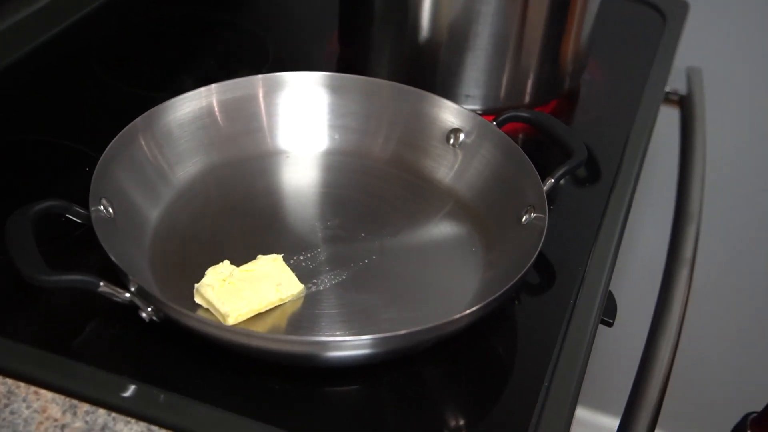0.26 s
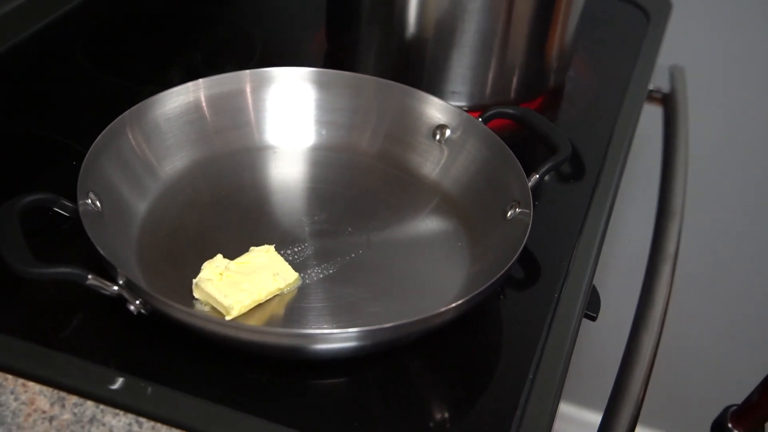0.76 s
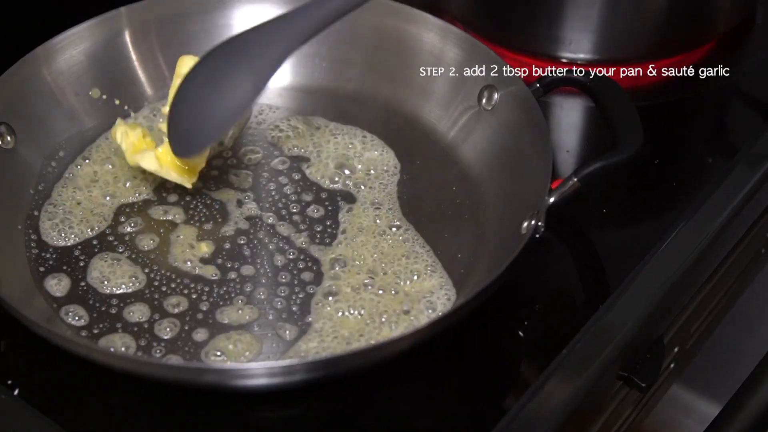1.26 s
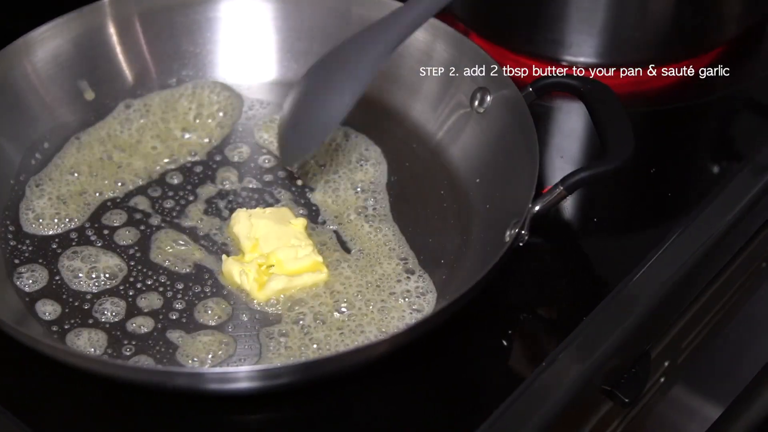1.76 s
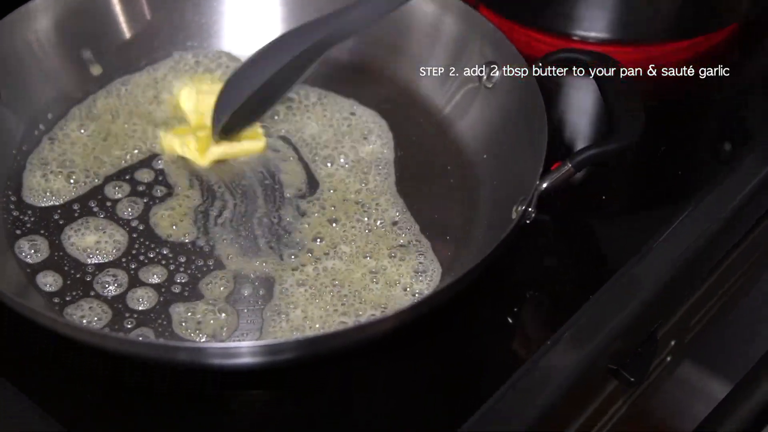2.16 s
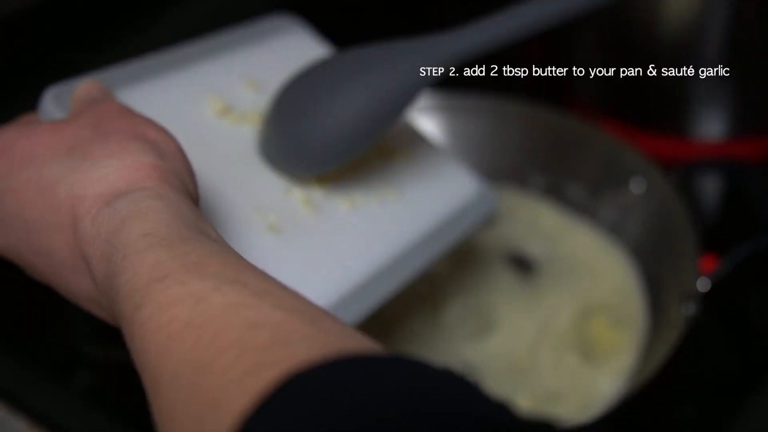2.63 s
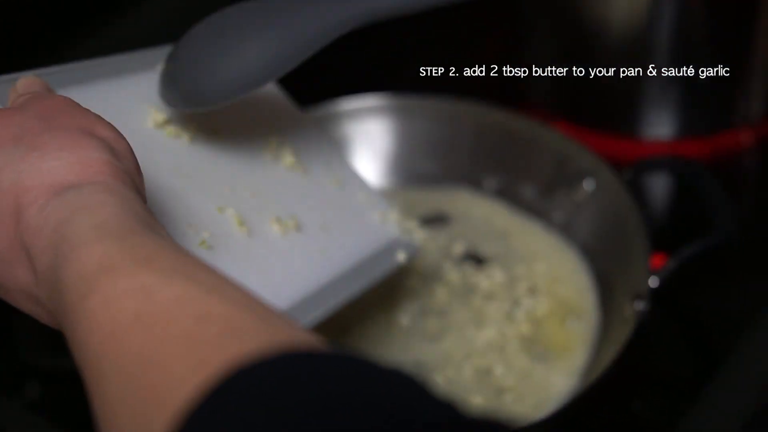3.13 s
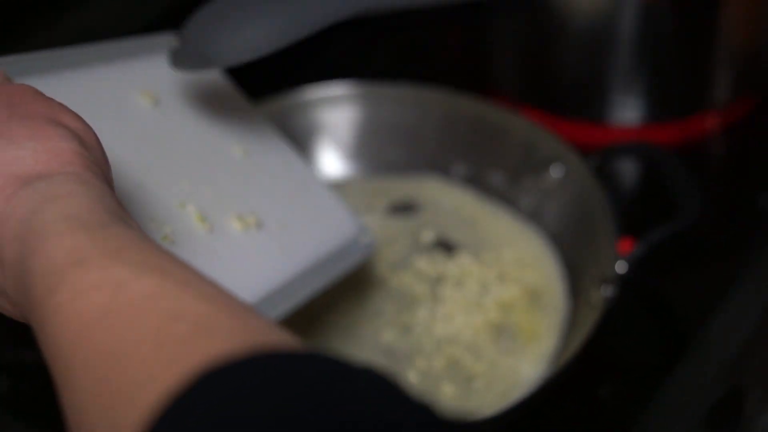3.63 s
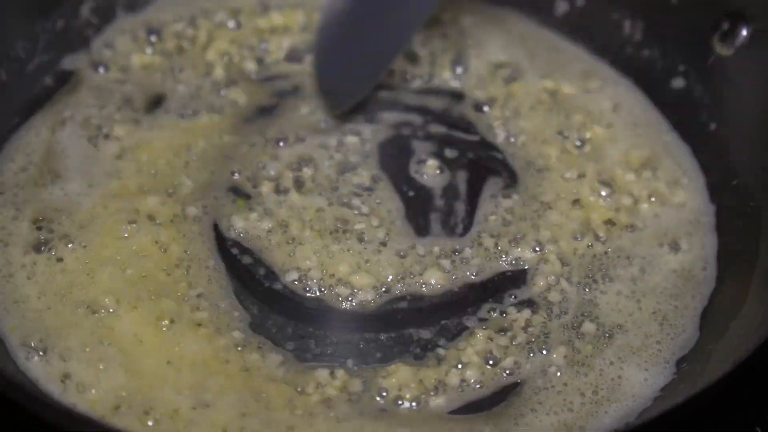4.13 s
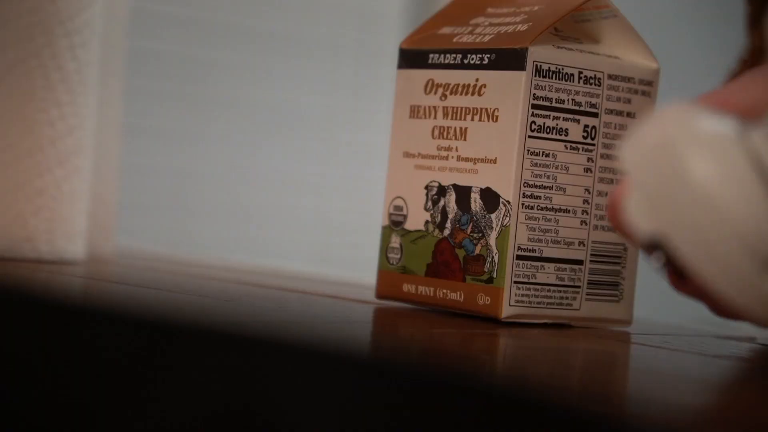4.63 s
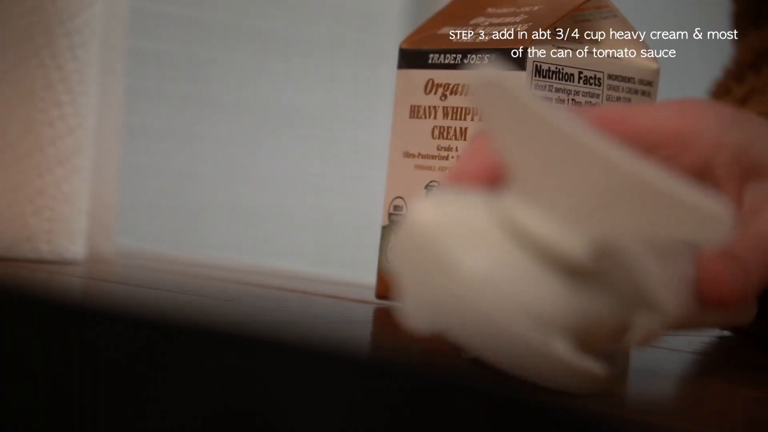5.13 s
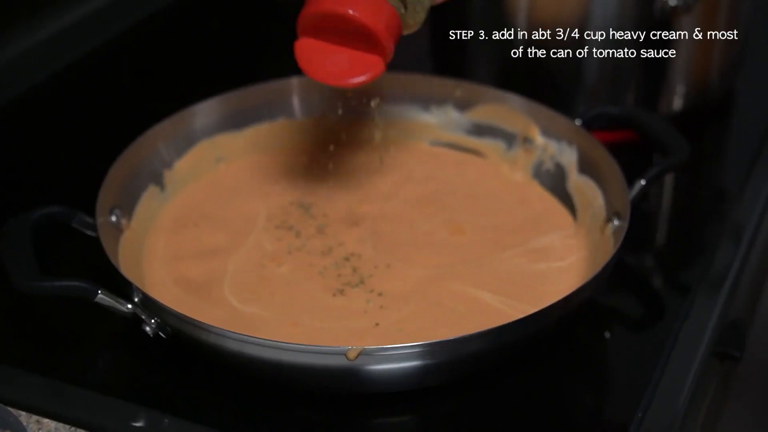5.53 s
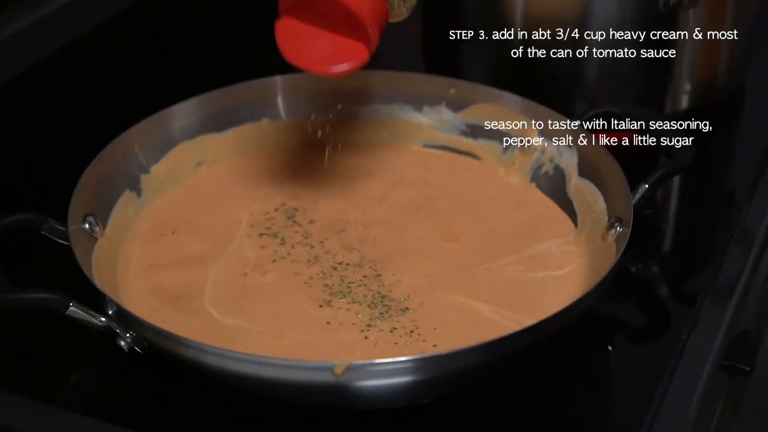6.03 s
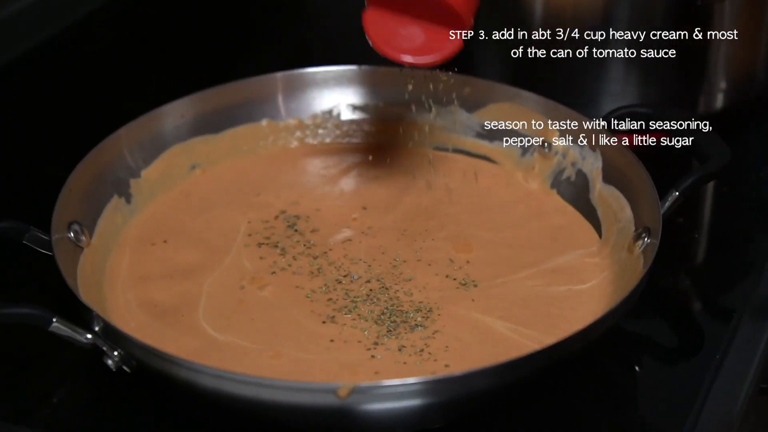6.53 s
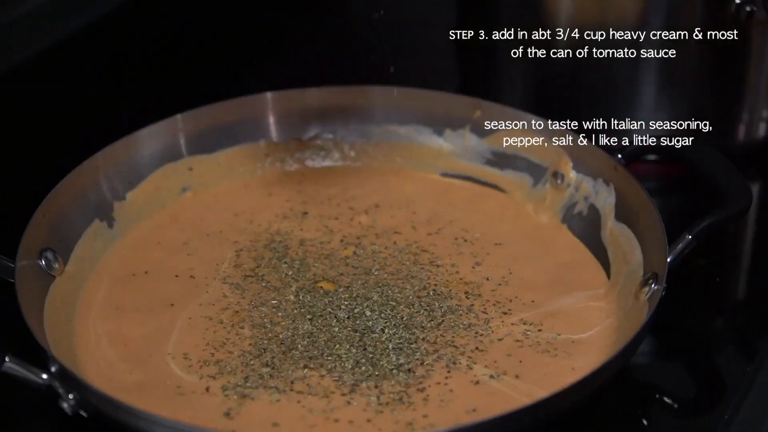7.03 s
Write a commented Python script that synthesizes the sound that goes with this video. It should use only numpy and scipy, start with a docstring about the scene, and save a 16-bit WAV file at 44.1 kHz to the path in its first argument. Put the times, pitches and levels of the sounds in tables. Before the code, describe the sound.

In a home kitchen, a nearby microphone catches the bright fizz and crackle of butter frying over a faint simmer and hum. The sizzle shifts abruptly in level, softening for a few light spoon scrapes on a board. Two loud knocks on a wooden counter follow, the second ending in a short rattle. Last come quiet, even shakes of a jar of dried herbs, a few quick slaps on it and small bubbles in thick sauce.

```python
"""A home kitchen, six short scenes, one microphone. Butter melts and sizzles in a steel pan as its water
boils out. A nylon spoon stirs it and scrapes garlic off a board. A bundle is banged twice on a wooden
counter and rattles to rest. Dry herbs rush against the lid of a jar that is shaken and slapped.
Behind it all, steam bubbles collapse in a large pot over the hum of the kitchen."""
import sys
import numpy as np
from scipy import signal
from scipy.fft import rfft, irfft, next_fast_len
from scipy.io import wavfile
from scipy.ndimage import uniform_filter1d, map_coordinates

SR = 44100
rng = np.random.default_rng(int(sys.argv[2]) if len(sys.argv) > 2 else 0)


def store_wav(level_fs):
    """Save 16-bit WAV to argv[1]."""
    pcm = np.round(np.clip(np.atleast_2d(level_fs), -1, 1) * 32767)
    wavfile.write(sys.argv[1], SR, pcm.T.astype(np.int16))


N = 321048

# six scenes: (start [s])
SCENE_STARTS_S = [0, 1.179, 2.634, 3.74, 4.502, 5.52]
# near pan, one table each for scenes 1-4: (time [s], body [dB], treble [dB])
PAN_LEVELS = [
    [(.1, -53.5, -54.5), (.6, -48.5, -50.5), (1.1, -45.5, -49.5)],
    [(1.2, -38.5, -37), (1.5, -39, -38.5), (1.95, -40.5, -40), (2.4, -43.5, -42), (2.47, -44.5, -38),
     (2.6, -41, -35)],
    [(2.7, -53.5, -74), (2.86, -50, -67), (2.95, -49.5, -50.5), (3.05, -51, -58), (3.7, -50, -58)],
    [(3.76, -47, -49), (3.9, -46.5, -48.5), (4.45, -48, -49.5)],
]


def sizzle():
    """Water boils out of the fat in tiny bursts; the treble follows the nearness of the pan."""
    # near and distant pan: (frequency [Hz], density [dB])
    near_spectrum = [(410, -28), (700, -12.5), (863, -10.5), (1350, -14), (1820, -7), (2270, -7.5),
                     (3110, 1.5), (3940, -3), (5610, -2), (12800, -8), (16000, -10.5)]
    far_spectrum = [(710, -22), (1200, -7), (1470, -37), (1870, -15), (2040, -15), (2230, -12.5),
                    (3470, -1.5), (12900, -18), (16000, -22)]
    body_db, treble_db = by_scene(PAN_LEVELS)
    fizz = bursts(count=20000, low_hz=1520, high_hz=14860, cycles=3.5,
                  spread_db=3.5, cap_db=12, share=0.19, patch_db=2.5, size=72)
    fizz = coloured(fizz, near_spectrum)
    treble = filtered(fizz, lambda hz: 1 / (1 + (6200 / (hz + 1)) ** 4))
    flutter_db = 0.68 * wobble(4.16) + 0.78 * wobble(9) + 0.42 * wobble(34.95)
    near = amp(flutter_db) * (amp(body_db) * unit(fizz - treble) + amp(treble_db) * unit(treble))
    # far off, echoes smooth the bursts into a hiss
    far_db = background_db()[0] + 0.62 * wobble(6.7) + 3.3 * wobble(3.58)
    return near + amp(far_db) * coloured(patchy(1.7), far_spectrum)


def spits():
    """A drop explodes in the fat: a short pitched spray under a thin click."""
    # loudest spits: (time [s], spray [dB], pitch [Hz], click [dB])
    loud_spits = [(0.353, -31.5, 4230, -35), (0.707, -31, 4300, -45), (.780, -31, 12500, -25.5),
                  (1.017, -31, 8000, -35), (1.046, -44, 3500, -33), (1.088, -34, 4900, -31),
                  (1.258, -26, 6300, -31), (1.277, -37, 5800, -35), (1.356, -32, 5700, -30),
                  (1.38, -39, 5900, -27), (1.476, -24.5, 5500, -23), (1.67, -29, 5400, -28),
                  (2.11, -34, 5400, -31), (2.491, -38, 3100, -33), (3.472, -33.5, 3420, -43),
                  (3.565, -34.5, 2970, -48), (3.772, -49, 4900, -37), (3.906, -43, 3400, -37),
                  (4.146, -33.5, 5700, -35), (4.277, -30, 2000, -14.5), (4.48, -49, 5740, -33)]
    out, t = np.zeros(N + SR), np.arange(SR // 30) / SR
    click_env = amp(-60 * t / .004) + amp(-19 - 60 * t / .03)
    spray_env = (amp(-60 * t / .012) + amp(-13 - 60 * t / .06)) * (1 - np.exp(-t / .0004))
    click_band = signal.butter(2, [2500, 15500], "bandpass", fs=SR)
    for s, spray_db, hz, click_db in loud_spits + small_spits(count=40):
        spray = unit(signal.lfilter(*signal.iirpeak(hz, 2, SR), rng.standard_normal(len(t))))
        click = unit(signal.lfilter(*click_band, rng.standard_normal(len(t))))
        spit = amp(spray_db) * spray_env * spray + amp(click_db) * click_env * click
        out[int(s * SR):][:len(t)] += spit
    return out[:N]


def small_spits(count, low_hz=3000, high_hz=7000, spread_db=2.5):
    """Random rows for spits(), scaled to the near pan."""
    when, pitch, *sizes = rng.random((count, 4)).T
    s = when * SCENE_STARTS_S[4]
    extra_db = -spread_db * np.log(1 - np.array(sizes))
    body_db, treble_db = by_scene(PAN_LEVELS)[:, (s * SR).astype(int)] + extra_db
    return list(zip(s, body_db + 2, low_hz + pitch * (high_hz - low_hz), treble_db + 6))


def droplet_ticks(count, low_hz=7700, high_hz=15000, spread_db=3):
    """The finest droplets snap dry and high, above the pan's treble."""
    when, pitch, size = rng.random((count, 3)).T
    s = when * SCENE_STARTS_S[4]
    treble_db = by_scene(PAN_LEVELS)[1, (s * SR).astype(int)]
    tick_db = treble_db + 12.5 - spread_db * np.log(1 - size)
    return pings(s, amp(tick_db), low_hz + pitch * (high_hz - low_hz), cycles=2.7, size=96)


def counter_knocks():
    """Each contact cracks and rings the counter; a softer one reaches fewer high modes."""
    # bundle on counter: (time [s], thud [dB], crack [dB])
    contacts = [(4.536, -12, -17.5), (4.557, -29, -39), (4.789, -15.5, -6.5), (4.8, -22, -26),
                (4.830, -20, -22), (4.852, -24.5, -17.5), (4.864, -24, -25), (4.881, -32, -26.5),
                (4.893, -28, -33), (4.912, -35, -31), (4.947, -45, -53), (5.0, -44, -43)]
    # counter top: (frequency [Hz], level [dB], t60 [s])
    counter_modes = [(158, -8, 0.15), (200.4, -2.5, 0.13), (228.5, -10.5, 0.23), (272, -10.5, 0.19),
                     (326.5, -6.5, 0.073), (369, -13, 0.078), (440, -11.5, 0.081), (508, -11, 0.037),
                     (637, -5, 0.075), (700, -5.5, 0.03), (1020, 3, 0.015), (1275, -3, 0.02),
                     (1570, -12, 0.02), (2310, -22, 0.014), (3174, 1, 0.019)]
    # contact noise: (frequency [Hz], gain [dB])
    crack_spectrum = [(100, -8), (400, 3), (1500, 1.5), (3300, -2), (4500, -12), (8800, -18.5),
                      (12000, -31), (20000, -50)]
    thuds, cracks, t = np.zeros(N + SR), np.zeros(N + SR), np.arange(SR // 2) / SR
    modes = np.array([amp(db - 60 * t / t60) * np.sin(2 * np.pi * hz * t)
                      for hz, db, t60 in counter_modes])
    crack_env = np.exp(-(t / 0.0051) ** 2) + amp(-12.5 - 60 * t / 0.21)
    for s, thud_db, crack_db in contacts:
        reach_hz = min(1450 * amp(crack_db - thud_db), 15000)
        ring = amp(rng.normal(0, 1.8, len(modes))) @ modes
        thud = signal.lfilter(*signal.butter(2, reach_hz, fs=SR), ring)
        thuds[round(s * SR):][:len(t)] -= amp(thud_db) * thud
        cracks[round(s * SR):][:len(t)] += amp(crack_db) * crack_env * rng.standard_normal(len(t))
    cracks = filtered(cracks[:N], lambda hz: amp(along(crack_spectrum, hz)))
    damped = modes[2:7].sum(axis=0) * amp(-60 * t / 0.27)  # by the bundle's resting weight
    low_cut = signal.butter(8, 132, "highpass", fs=SR, output="sos")
    return signal.sosfilt(low_cut, thuds[:N] + cracks + rocking(damped))


def rocking(ring, start_s=4.79, settle_s=5.18, fall_db_per_s=70):
    """The bundle rocks and drags: tiny uneven contacts keep the counter ringing."""
    t = np.arange(N) / SR
    envelope = amp(-26 - fall_db_per_s * (t - start_s)) * ((t > start_s) & (t < settle_s))
    jostle = envelope * amp(3.3 * wobble(60)) * rng.standard_normal(N)
    return signal.fftconvolve(jostle, ring / np.linalg.norm(ring))[:N]


def spoon_scrapes(rise_share=0.27, lift_off_s=0.031, chatter_db=3):
    """The spoon edge chatters over the board's resonances, slightly higher in mid-stroke."""
    # spoon on board: (start [s], length [s], level [dB])
    strokes = [(2.645, 0.21, -46.5), (2.879, 0.038, -48), (3.274, .16, -43.5), (3.44, 0.059, -47)]
    # board: (frequency [Hz], bandwidth [Hz], gain [dB])
    board_modes = [(675, 250, -8.5), (1806, 79, 5), (2210, 230, -6.5), (3060, 450, -11)]
    t = np.arange(N) / SR
    grit = amp(0.86 * wobble(70)) * rng.standard_normal(N)

    def board(tuning):
        return unit(filtered(grit, lambda f: sum(
            (-1) ** k * amp(db) * 1j * f * width / ((tuning * hz) ** 2 - f * f + 1j * f * width)
            for k, (hz, width, db) in enumerate(board_modes))))

    envelope, pressure = np.zeros((2, N))
    for s, length_s, db in strokes:
        rise, fall = (t - s) / (rise_share * length_s), (s + length_s - t) / lift_off_s
        envelope += amp(db) * np.clip(np.minimum(rise, fall), 0, 1)
        pressure += np.sin(np.pi * np.clip((t - s) / length_s, 0, 1)) ** 2
    rub = (1 - pressure) * board(0.99) + pressure * board(1.041)
    return rub * envelope * amp(chatter_db * wobble(35))


def herb_jar():
    """Dry flakes rush against the lid at each shake or slap, more softly on the return stroke."""
    # downstrokes and hand slaps: (time [s], level [dB])
    shakes = [(5.56, -50), (5.758, -49.5), (5.955, -49.5), (6.155, -48.5), (6.359, -48.5), (6.554, -47),
              (6.756, -48), (6.947, -47), (7.265, -46)]
    slaps = [(7.061, -41.5), (7.106, -36.5), (7.151, -35.5)]
    # flakes in the jar: (frequency [Hz], density [dB])
    flake_spectrum = [(530, -36), (900, -3), (1660, -2.5), (1990, -4), (2600, -2), (3380, 2), (4250, -3.5),
                      (11000, -7.5), (15100, -13.5), (16000, -6)]
    returns = [(s + 0.12, db - 11) for s, db in shakes]
    rush = swells(shakes, rise_s=0.026, fall_s=0.032)
    rush += swells(returns, rise_s=0.018, fall_s=0.018)
    rush += swells(slaps, rise_s=0.009, fall_s=0.021)
    flakes = bursts(count=30000, low_hz=930, high_hz=15800, cycles=1.5,
                    spread_db=4, cap_db=8, share=.3, patch_db=1.5, size=48)
    return rush * amp(1.3 * wobble(90)) * coloured(flakes, flake_spectrum)


def simmer():
    """Steam bubbles collapse in the pot; from the side (scenes 2-4) it booms at other pitches."""
    # pot, and pot from the side of the stove: (frequency [Hz], density [dB])
    pot_spectrum = [(140, -46), (230, -10), (271, -8), (296, -9.5), (389, -1.5), (445, -4.5), (569, -13),
                    (617, -10.5), (780, -7.5), (1010, -20), (1150, -17), (2000, -20), (2600, -20),
                    (4400, -120)]
    side_spectrum = [(140, -47), (230, -8), (285, -8), (334, 1.5), (399, -1), (467, -10.5), (532, -3),
                     (594, -7), (863, -8), (1100, -16.5), (1430, -13.5), (2420, -120)]
    t = np.arange(N) / SR
    bubbles = bursts(count=4000, low_hz=254.5, high_hz=1982, cycles=4.9,
                     spread_db=1.5, cap_db=13.5, share=0.066, patch_db=3.0, size=900)
    from_side = (t > SCENE_STARTS_S[1]) & (t < SCENE_STARTS_S[4])
    boil = np.where(from_side, coloured(bubbles, side_spectrum), coloured(bubbles, pot_spectrum))
    return amp(background_db()[1] + 0.98 * wobble(9) + 0.31 * wobble(2.94)) * boil


def plops():
    """Single bubbles ring with rising pitch; thick sauce adds small ones in the last scene."""
    # biggest bubbles and spoon bumps: (time [s], level [dB], pitch [Hz])
    big_plops = [(1.475, -40, 614), (1.503, -41, 137), (1.554, -37.5, 595), (2.834, -35.5, 726),
                 (3.433, -32.5, 656), (5.514, -40, 484), (5.733, -35.5, 387), (6.492, -37, 417),
                 (6.661, -34.5, 670), (6.765, -35.5, 410), (6.91, -38.5, 384)]
    small_plops = [(rng.uniform(SCENE_STARTS_S[5], N / SR), rng.normal(-45, 2.3),
                    401 * amp(rng.normal(0, 0.75)) * rng.choice([0.95, 0.974, 1, 1.8]))
                   for _ in range(20)]
    s, db, hz = np.transpose(big_plops + small_plops)
    return pings(s, amp(db), hz, cycles=3.9, size=2500, glide=0.0068)


def stand_bumps():
    """Dull pushes travel through the counter and the microphone stand."""
    # (time [s], level [dB], pitch [Hz])
    pushes = [(.72, -49, 33), (.79, -49, 33), (1.5, -46, 70), (4.536, -37, 55), (4.789, -42, 60)]
    s, db, hz = np.transpose(pushes)
    return pings(s, amp(db), hz, cycles=2.1, size=9000)


def hum():
    """Low unsteady noise with mains tones."""
    # mains tones: (frequency [Hz], amplitude re noise rms [dB])
    mains = [(60, -7.5), (120, -1.5)]
    # low noise: (frequency [Hz], density [dB])
    hum_spectrum = [(12, 0.5), (25, -1.5), (60, -6.5), (95, -3.5), (125, -2.5), (170, 3.5), (240, -10),
                    (400, -46)]
    t = np.arange(N) / SR
    tones = sum(amp(db + 1.1 * wobble(8)) * np.sin(2 * np.pi * hz * t) for hz, db in mains)
    drone = unit(coloured(rng.standard_normal(N), hum_spectrum) + tones)
    return amp(background_db()[2] + .6 * wobble(6) + .9 * wobble(2.5)) * drone


def kitchen_reverb(x):
    """Reflections die at a different rate at each frequency."""
    # (frequency [Hz], t60 [s])
    decay = [(150, 0.47), (1000, 0.37), (4000, 0.57), (12000, 0.43)]
    hz, t, z = signal.stft(rng.standard_normal(SR // 2), SR, nperseg=256)
    tail = signal.istft(z * amp(-60 * t / along(decay, hz)[:, None]), SR, nperseg=256)[1]
    return signal.fftconvolve(np.pad(x, (300, 0)), tail / np.linalg.norm(tail))[:N]


def background_db():
    """Per-sample levels of distant pan, simmer and hum."""
    # per scene: (distant pan [dB], simmer start [dB], simmer end [dB], hum start [dB], hum end [dB])
    levels = [(-120, -57, -57, -58, -56.5), (-120, -56, -53.5, -58, -57.5),
              (-120, -52.5, -52, -55.5, -55.5), (-120, -54, -51.5, -54, -55), (-51, -54, -53.5, -58, -65.5),
              (-66, -53.5, -51.5, -56, -55.5)]
    spans = zip(SCENE_STARTS_S, SCENE_STARTS_S[1:] + [N / SR], levels)
    return by_scene([[(start, pan, pot0, hum0), (end, pan, pot1, hum1)]
                     for start, end, (pan, pot0, pot1, hum0, hum1) in spans])


def by_scene(tables, silent_db=-120.0):
    """Per-sample level columns from one (time [s], levels [dB]...) table a scene."""
    t = np.arange(N) / SR
    out = np.full((len(tables[0][0]) - 1, N), silent_db)
    for start, end, rows in zip(SCENE_STARTS_S, SCENE_STARTS_S[1:] + [N / SR], tables):
        s, *columns = np.transpose(rows)
        inside = (t >= start) & (t < end)
        out[:, inside] = [np.interp(t[inside], s, column) for column in columns]
    return out


def bursts(count, low_hz, high_hz, cycles, spread_db, cap_db, share, patch_db, size):
    """Random pings, a few large, carry a share of the power; noise stands for countless small ones."""
    when, pitch, big = rng.random((count, 3)).T
    hz = low_hz + (high_hz - low_hz) * pitch
    db = np.minimum(-spread_db * np.log(1 - big), cap_db)
    gain = np.sqrt(hz) * amp(db)  # equal energy at every pitch
    pops = unit(pings(when * N / SR, gain, hz, cycles, size))
    return np.sqrt(share) * pops + np.sqrt(1 - share) * patchy(patch_db)


def pings(s, gain, hz, cycles, size, glide=0):
    """Damped sines, `size` samples long, falling to 1/e in `cycles`."""
    turn = np.arange(size) / SR * hz[:, None]
    wave = gain[:, None] * np.sin(2 * np.pi * turn * (1 + glide * turn)) * np.exp(-turn / cycles)
    at = (s * SR).astype(int)[:, None] + np.arange(size)
    return np.bincount(at.ravel(), wave.ravel(), N + size)[:N]


def patchy(depth_db, bins=3, frames=5):
    """Noise of rms 1 whose level drifts in patches over pitch and time."""
    z = signal.stft(rng.standard_normal(N), nperseg=1024)[2]
    field = uniform_filter1d(uniform_filter1d(rng.standard_normal(z.shape), bins, 0), frames, 1)
    return unit(signal.istft(z * amp(depth_db * unit(field)), nperseg=1024)[1][:N])


def swells(rows, rise_s, fall_s):
    """Bell-shaped gains from (time [s], level [dB])."""
    t = np.arange(0, N + 32, 32) / SR
    gain = sum(amp(db) * np.exp(-.5 * ((t - s) / np.where(t < s, rise_s, fall_s)) ** 2) for s, db in rows)
    return np.interp(np.arange(N) / SR, t, gain)


def wobble(rate_hz):
    """Smooth random curve with knots at rate_hz."""
    return map_coordinates(rng.standard_normal(int(N * rate_hz / SR) + 4), [np.arange(N) * rate_hz / SR])


def coloured(x, spectrum):
    """x shaped by (frequency [Hz], gain [dB]), at rms 1."""
    return unit(filtered(x, lambda hz: amp(along(spectrum, hz))))


def filtered(x, response):
    """x through a complex frequency response."""
    size = next_fast_len(N + SR // 2)
    return irfft(rfft(x, size) * response(np.fft.rfftfreq(size, 1 / SR)), size)[..., :N]


def along(points, hz):
    """Interpolate (frequency [Hz], value) on a log axis."""
    knots_hz, values = np.transpose(points)
    return np.interp(np.log(hz + 1), np.log(knots_hz + 1), values)


def amp(db):
    """dB to gain."""
    return 10 ** (np.asarray(db) / 20)


def unit(x):
    """x at rms 1."""
    return x / np.sqrt(np.mean(x ** 2) + 1e-20)


def scene():
    """Mono mix; knocks, spits and ticks also excite the room."""
    hits = counter_knocks() + spits() + droplet_ticks(count=220)
    mono = hits + amp(-11.5) * kitchen_reverb(hits)
    mono += sizzle() + spoon_scrapes() + herb_jar()
    mono += simmer() + plops() + stand_bumps() + hum()
    return np.array([mono, mono])


def record(dry):
    """Steep low-pass at 16 kHz."""
    return filtered(dry, lambda hz: 1 / (1 + (hz / 16000) ** 200))


dry = scene()
out = record(dry)
store_wav(out)
```